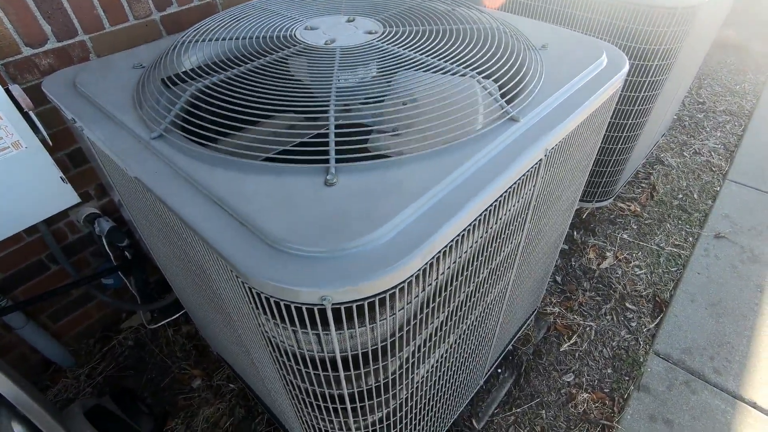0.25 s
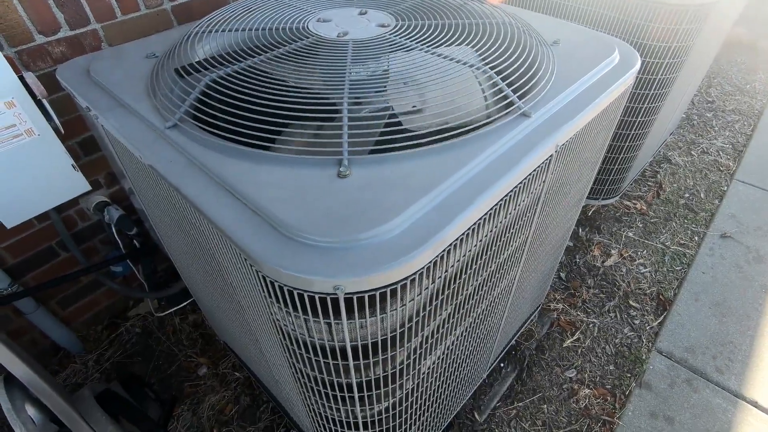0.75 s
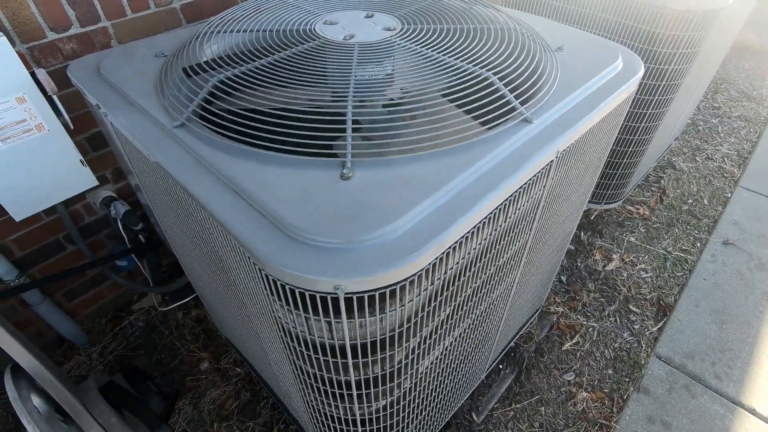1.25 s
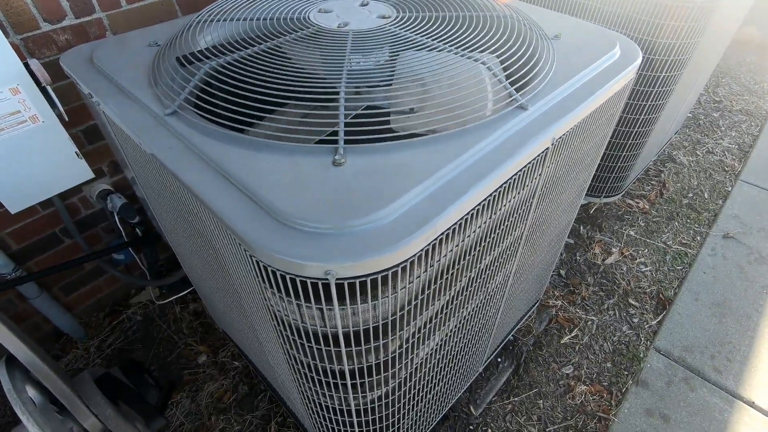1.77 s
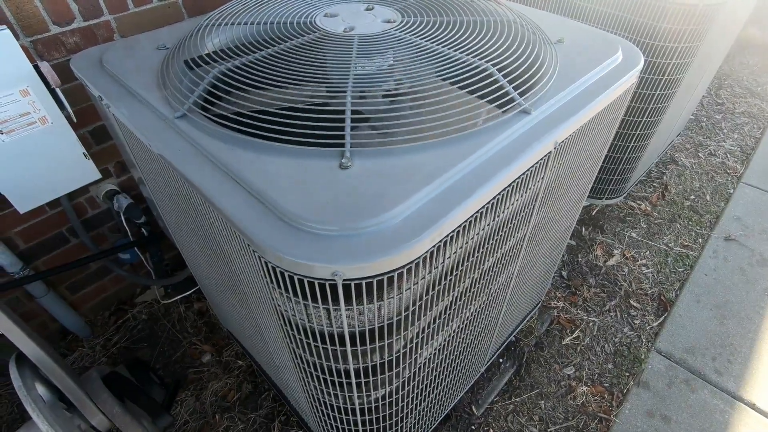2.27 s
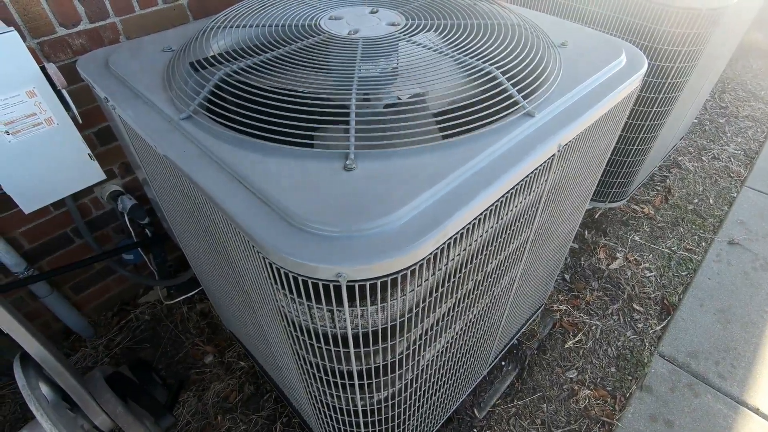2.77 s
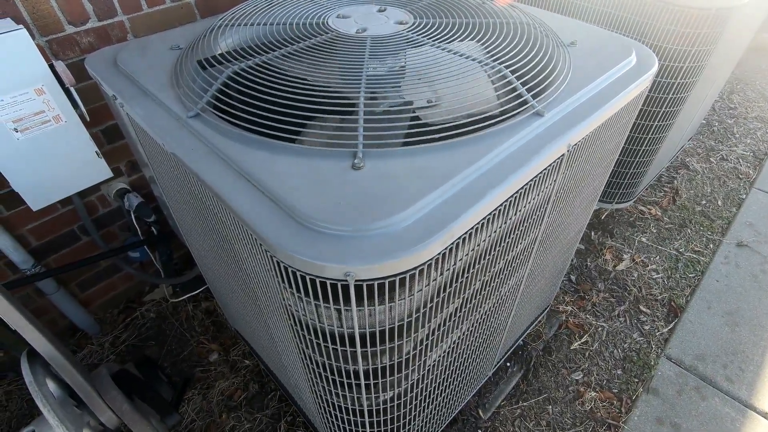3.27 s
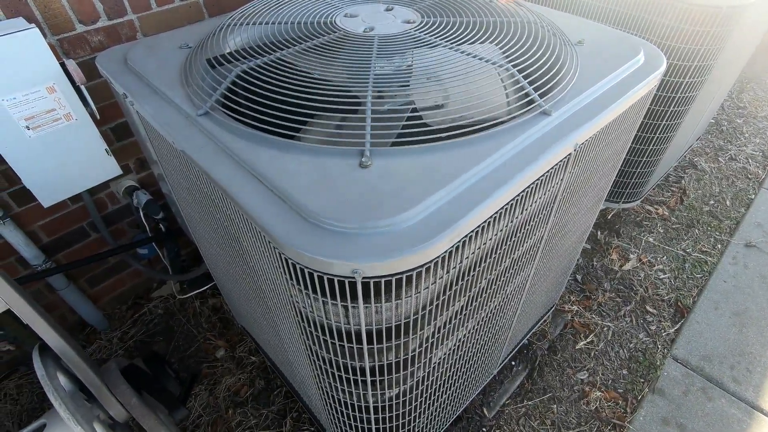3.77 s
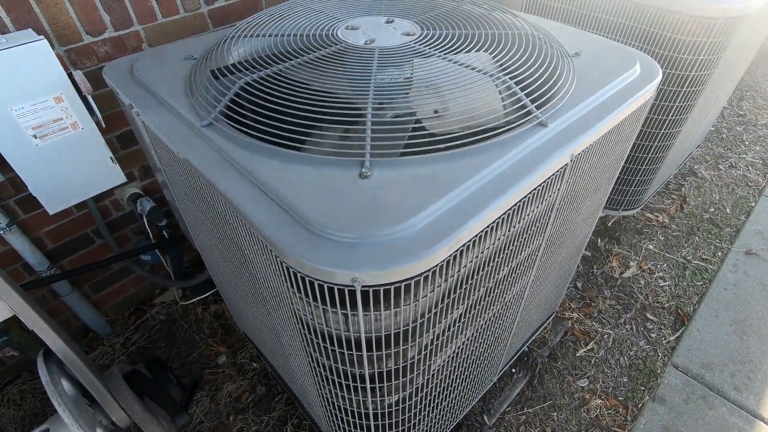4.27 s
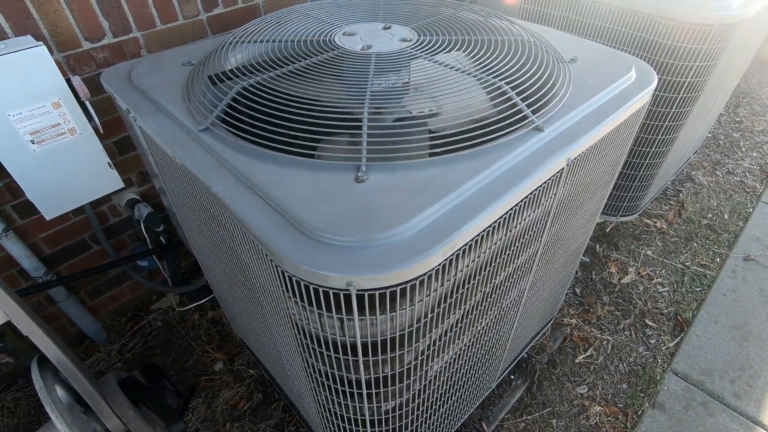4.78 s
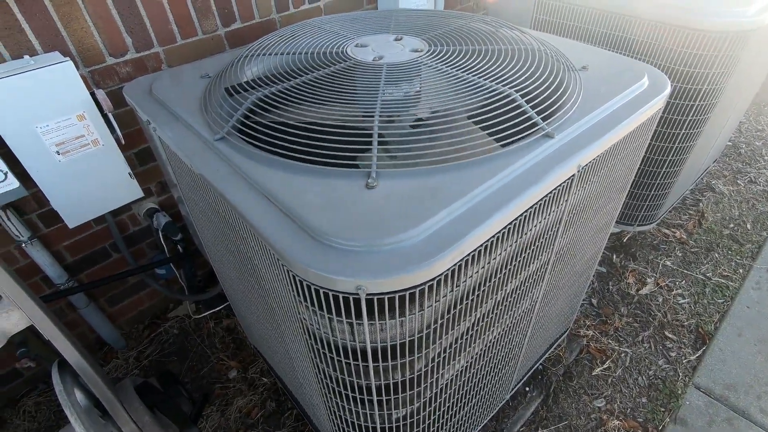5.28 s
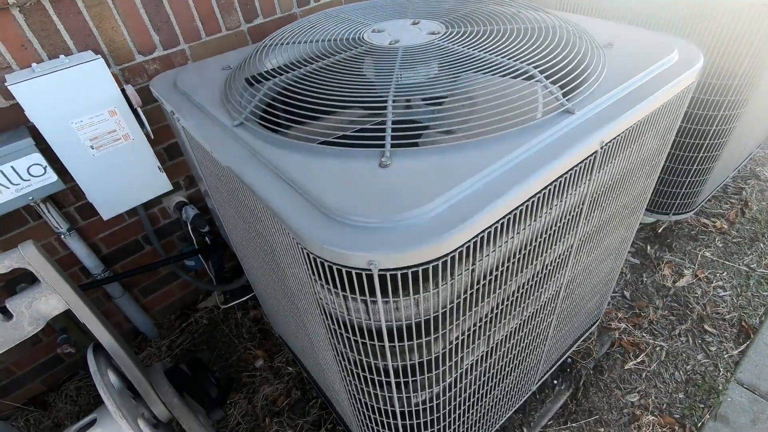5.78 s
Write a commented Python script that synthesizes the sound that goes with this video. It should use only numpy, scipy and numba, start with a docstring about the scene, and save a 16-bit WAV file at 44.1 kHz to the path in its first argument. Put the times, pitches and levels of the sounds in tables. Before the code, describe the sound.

From 0 to about 3 seconds an outdoor heat pump runs loudly, close by. Its deep, steady hum is centred near 240 hertz over a shaft rate of about 60, roughened by a fast buzzing shell rattle and refrigerant hiss puffing once per turn. Fan air rumbles underneath, and two faint low tones drift slowly upward. Between 3 and 3.6 seconds the hum drops sharply, the bright buzz falling away first, leaving a softer, lower hum and airy hiss. Faint pipe whistles flicker near 3.9 seconds. Light finger rubs and soft bumps touch the camera at 4.05 to 4.3. From 4.95 to 5.5 come clustered scrapes, sharp ticks and dull low thumps, strongest near 5.0, 5.15, 5.35 and 5.45. Another faint whistle passes around 5.6 to 5.85 while the hiss loses treble and sinks, leaving quiet hum and fan rumble to about 6 seconds.

```python
"""An outdoor heat pump, a step from a hand-held camera. The compressor beats once a shaft turn: the casing hums on
multiples of that rate, a burst-driven valve rattles the shell, and refrigerant noise hisses in puffs.
Fan noise rumbles throughout, the windings beat against the hum, and two low tones drift by.
After three seconds the load falls away and pipes whistle faintly; fingers rub, tick and bump on the camera body."""
import sys
import numpy as np
from scipy import signal
from scipy.fft import rfft, irfft, next_fast_len
from scipy.io import wavfile
from scipy.ndimage import uniform_filter1d, map_coordinates
from numba import njit

SR = 44100
rng = np.random.default_rng(int(sys.argv[2]) if len(sys.argv) > 2 else 0)


def master(y):
    """Save y as 16-bit WAV."""
    cut = np.clip(np.atleast_2d(y).T, -1, 1)
    pcm = np.round(cut * 32767)  # scale
    wavfile.write(sys.argv[1], SR, pcm.astype(np.int16))


N = 266011
t = np.arange(N) / SR

# Table levels are relative, ahead of the port response.
# compressor load: start_s, load [0-1], hum_db, hiss_db
LOAD_COURSE = [(0, 0.95, -23.5, -44), (1.3, 0.94, -23, -41.5), (2.85, 0.86, -23, -41.5),
               (3.05, 0.79, -25.5, -42.5), (3.3, 0.73, -31, -47.5), (3.6, 0.32, -33.5, -48.5),
               (4.1, 0.24, -34, -47), (4.8, 0.15, -34.5, -47), (5.2, 0.06, -38, -46),
               (5.55, 0.04, -42, -50.5), (5.8, 0, -44, -55), (6.03, 0, -43, -57)]
# casing hum under load: shaft_multiple, level_db
HUM_LOADED = [(1, -34.5), (2, -9), (3, -4), (4, 2.5), (5, -2.5), (6, -20.5), (7, -24.5), (8, -36), (9, -33),
              (10, -24.5), (11, -31), (12, -19), (13, -17.5), (14, -12.5), (15, -21.5), (16, -28),
              (17, -34.5), (18, -49), (19, -63), (20, -52.5), (21, -35.5), (22, -31), (23, -39.5),
              (24, -30), (25, -25), (26, -27), (27, -30), (28, -56.5), (29, -35), (30, -34), (31, -48),
              (32, -39), (33, -44), (34, -33.5), (35, -36.5), (36, -37), (37, -28), (38, -38), (39, -55.5),
              (40, -32.5), (41, -34), (42, -34), (43, -28.5), (44, -49), (45, -43), (46, -32), (47, -41.5),
              (48, -36), (49, -38.5), (50, -51), (51, -25.5), (52, -39), (53, -32.5), (54, -32), (55, -36),
              (56, -41.5), (57, -29), (58, -30), (59, -42), (60, -29.5), (61, -52), (62, -42), (63, -33),
              (64, -33.5)]
# casing hum off load: shaft_multiple, level_db
HUM_UNLOADED = [(1, -4.5), (2, -10.5), (3, -10.5), (4, -0.5), (5, -4), (6, -17), (7, -14.5), (8, -15.5),
                (9, -26.5), (10, -28), (11, -36), (12, -29.5), (13, -23.5), (14, -18), (15, -24.5),
                (16, -28.5), (17, -24), (18, -32), (19, -55), (20, -23), (21, -28.5), (22, -18.5),
                (23, -30), (24, -22.5), (25, -29.5), (26, -25), (27, -28), (28, -23), (29, -27), (30, -54),
                (31, -29), (32, -29), (33, -29), (34, -36.5), (35, -38), (36, -29), (37, -28.5), (38, -41),
                (39, -67), (40, -44), (41, -27), (42, -39), (43, -47), (44, -37), (45, -36), (46, -42),
                (47, -46), (48, -38), (49, -29.5), (50, -52), (51, -29), (52, -45), (53, -51), (54, -36),
                (55, -34), (56, -48), (57, -40), (58, -28), (59, -51), (60, -58), (61, -29), (62, -37),
                (63, -30), (64, -40)]
# shell modes: centre_hz, stage_width_hz, loaded_db, unloaded_db
SHELL_MODES = [(1242, 570, 1.5, 5), (3437, 39, -13.5, -8), (3970, 590, -1, -0.5), (4650, 590, 0, -10),
               (5060, 950, 1.5, -9), (5510, 300, 2, -2.5), (5940, 215, 7.5, 5), (6360, 130, -15, 3),
               (7350, 120, 4, -14.5), (8160, 76, -5, -19)]
# pipe resonances in the gas flow: centre_hz, width_hz, loaded_db, unloaded_db
PIPE_MODES = [(1320, 120, -19, 7), (2940, 125, -4, 11.5), (3230, 57, 4, 8.5), (3448, 66, 9.5, 11),
              (4690, 16, -17, 16.5), (3840, 97, -1.5, 8), (4465, 330, -0.5, 4), (5260, 180, -28, 6.5),
              (5560, 230, -3.5, -8), (6350, 680, -2, 1), (6760, 250, -10, 4.5), (7550, 120, -7, -39),
              (7800, 250, -3, -7), (9170, 112, -9.5, -1), (9730, 730, -24, -11.5), (11900, 600, -19, -19),
              (12700, 790, -29, -17), (13700, 800, -26, -28)]
# gas rush spectrum under load: freq_hz, density_db [dB per Hz]
RUSH_LOADED = [(410, -37), (700, -7), (839, -4), (1120, -40.5), (1500, -1), (1820, -15), (2720, -4),
               (3140, -15), (4170, -19), (5910, -10.5), (13200, -39), (15400, -68)]
# gas rush spectrum off load: freq_hz, density_db [dB per Hz]
RUSH_UNLOADED = [(410, -37), (700, -7), (828, 0.5), (1120, -11.5), (1300, 0), (2650, -12), (3390, -38),
                 (4930, -17), (6640, -16), (8280, -22.5), (12500, -30), (15400, -55)]
# fan spectrum: freq_hz, density_db [dB per Hz]
FAN_SPECTRUM = [(22, -44), (40, 3), (60, -4.5), (100, 10), (140, -12.5), (220, 0), (400, -20.5), (700, -20),
                (1200, -39.5), (2500, -26)]
# steady high hiss: centre_hz, width_hz, level_db
AIR_BANDS = [(12700, 600, -75), (13500, 3500, -74.5)]
# low drifting tone: start_s, pitch_hz, level_db
DRONE_COURSE = [(0, 79.1, -42), (.6, 86, -41), (1.2, 94, -40.5), (2, 101, -43), (2.8, 98.4, -40),
                (3.6, 99.7, -59), (4, 93.5, -89)]
# pipe whistles: start_s, length_s, pitch_hz, level_db
PIPE_WHISTLES = [(3.883, 0.087, 3770, -53), (3.913, 0.047, 4600, -48), (5.56, 0.29, 3750, -52.5)]
# finger rubs: start_s, length_s, level_db, first_tilt, last_tilt [dB per octave], end_pitch_factor
FINGER_RUBS = [(4.039, 0.022, -40, -2, 2, .8), (4.95, 0.019, -39.5, -10, -8, 1.02),
               (4.96, 0.61, -37.5, -26, -24, 0.93), (5.095, 0.077, -33.5, -10, -7.5, 1.11),
               (5.39, 0.073, -32.5, -6, -8, 1.0), (5.42, 0.04, -38, -1, 2, 1.33)]
# finger ticks: start_s, peak_db, tilt [dB per octave]
FINGER_TICKS = [(4.961, -26.5, 8), (5.098, -27, -11), (5.134, -28, 9), (5.248, -36, -16),
                (5.347, -23.5, -3.5), (5.426, -23, -9), (5.444, -27.5, 18)]
# bumps on the camera body: start_s, pitch_hz, ring_s [twice the 1/e time], level_db
BODY_BUMPS = [(4.052, 90, 0.11, -29), (4.293, 73, 0.035, -26), (4.999, 88, 0.014, -15),
              (5.158, 54.6, 0.049, -19.5), (5.354, 73.5, 0.021, -17), (5.444, 91, 0.024, -18),
              (5.456, 44.4, 0.074, -15.5), (5.169, 109.5, 0.017, -21), (5.386, 59, 0.058, -29.5)]
# camera body modes: centre_hz, stage_width_hz, level_db
BODY_MODES = [(415, 200, 7), (496, 330, -15), (944, 150, -0.5), (1166, 140, 4.5), (1517, 73, 2.5),
              (1890, 270, -1.5), (3500, 870, -4), (6660, 840, -3), (151, 150, -7.5)]
# two microphone ports: freq_hz, left_minus_right_db, left_lead_rad, likeness_index [0-1]
PORT_RESPONSE = [(30.2, -22, -0.67, 0.6), (58.7, -9.5, -0.29, 0.86), (110, -1, 0.13, 1),
                 (243, -5.5, -0.42, 0.13), (446, -8, 0.54, 0.7), (710, -10, 2.03, 0.63),
                 (893, -2.5, 1.35, 0.81), (1330, 2, 1.57, 0.61), (2710, 1.5, 0.66, 0.86),
                 (5470, -2.5, -0.92, 0.74), (6130, -5, 1.36, 0.75), (7700, 4.5, 1.63, 0.7),
                 (10400, -4, 1.77, 0.25), (12900, 3.5, -1.86, 0.32)]

SHAFT_HZ, MAGNETIC_PULL_HZ = 59.48, 120  # pull: twice the mains rate
# ahead of the low swing of the casing
VALVE_LEAD_TURNS, BRIGHT_LEAD_TURNS = 0.13, 0.0594
# pairs: loaded, unloaded
RATTLE_OVER_HISS_DB = (-1, -3.5)
TOP_OVER_HISS_DB, THIN_TOP_HZ = (-2, 6), 8200
WINDING_DB, WINDING_PEAK_S = (-48.5, -39.5), (0.83, 1.06)
# the hiss loses treble over this start and end
DULL_DB_PER_OCTAVE, DULL_FROM_HZ, DULL_S = -8, 5100, (5.55, 5.92)
FAN_DB, FAN_SWELL_DB = -37.5, 3.5
UNDERTONE_RATIO, UNDERTONE_DB = 0.61, -4
TOP_HZ = 15450


def undb(db):
    """Amplitude from dB."""
    return np.exp(np.asarray(db) * np.log(10) / 20)


def unit(x):
    """Scaled to rms 1."""
    return x / np.sqrt(np.mean(x ** 2))


def curves(table):
    """Every column as a line over time."""
    start_s, *columns = np.transpose(table)
    return [np.interp(t, start_s, column) for column in columns]


def over_hz(hz, table, column=1):
    """A column read on a log-frequency axis."""
    table = np.array(table)
    return np.interp(np.log(hz), np.log(table[:, 0]), table[:, column])


def by_load(pair, load):
    """Between the loaded and the unloaded value."""
    return pair[1] + load * (pair[0] - pair[1])


def walk(rate_hz):
    """Random levels joined smoothly, rate_hz a second; spread near 1."""
    step = int(SR / rate_hz)
    levels = rng.standard_normal(N // step + 2)
    line = np.interp(np.arange(N) / step, np.arange(N // step + 2), levels)
    return 1.09 * uniform_filter1d(line, step)


@njit
def ring_twice(x, hz, width):
    """A steep resonance: two state-variable band-passes with a moving centre, gain 1 there."""
    y, b, l, c, m = np.empty(len(x)), 0., 0., 0., 0.
    for i in range(len(x)):
        g, k = np.pi * hz[i] / SR, width / hz[i]
        g *= 1 + g * g / 3 + g ** 4 * 2 / 15  # tangent series
        r = 1 / (1 + g * (g + k))
        v = (b + g * (x[i] - l)) * r
        w = (c + g * (k * v - m)) * r
        b, l, c, m, y[i] = 2 * v - b, l + 2 * g * v, 2 * w - c, m + 2 * g * w, k * w
    return y


def band(hz, width_hz, drift=0):
    """Two unrelated noises through one steep resonance; power follows the width."""
    centre_hz = hz * (1 + drift + 0 * t)
    return np.array([ring_twice(rng.standard_normal(N), centre_hz, 1.58 * width_hz) for _ in range(2)])


def casing(load):
    """Multiples of the shaft rate in the phases of a ring after one push; high ones waver more, unlike at each port."""
    order, loaded_db = np.transpose(HUM_LOADED)
    unloaded_db = np.transpose(HUM_UNLOADED)[1]
    # minimum phase from the folded cepstrum
    cepstrum = irfft(np.log(undb(np.r_[-30, loaded_db, -42 * np.ones(64)])))
    cepstrum[1:128] *= 2
    cepstrum[129:] = 0
    phases = rfft(cepstrum).imag[1:][:len(order)]
    phases = phases + 2 * np.pi * BRIGHT_LEAD_TURNS * np.maximum(order - 7, 0)
    # the shell spreads the push in time: high multiples lose step
    phases = phases + np.clip((order - 18) / 20, 0, 1) * 0.45 * rng.standard_normal(len(order))
    turn_rad = 2 * np.pi * SHAFT_HZ * t + 0.0055 * walk(7.6)
    # strokes differ: the bright end swells and sags within a few turns
    stroke_db = 1.28 * walk(45)
    hum = np.zeros((2, N))
    for k, full_db, idle_db, phase in zip(order, loaded_db, unloaded_db, phases):
        waver = walk(3.008)
        phase = phase + 0.0015 * k * stroke_db + min((k / 60) ** 3, 0.8) * np.roll(waver, N // 2)
        # bright multiples fall away first as the load drops
        level_db = idle_db + load ** min(1 + k / 6, 3.2) * (full_db - idle_db)
        level_db = level_db + min(0.12 + (k / 13) ** 2, 3.5) * waver + min(k / 35, 1) * stroke_db
        line = -undb(level_db) * np.cos(k * turn_rad + phase)
        hum[0] += line
        hum[1] += min((k / 14) ** 2, 1.2) * line * waver[::-1]
    return np.sqrt(2) * hum


def valve(load):
    """Nearly the same burst of rattle every turn rings the shell; it limps strong-weak for a while as load falls."""
    count, size = int(N / SR * SHAFT_HZ) + 3, int(SR / SHAFT_HZ)
    keep = 0.85  # likeness of one burst to the next
    noise = rng.standard_normal((count + 60, size))
    bursts = signal.lfilter([np.sqrt(1 - keep ** 2)], [1, -keep], noise, axis=0)[60:]
    phase = np.arange(size) / size
    bursts = bursts * (0.26 + np.exp(-phase / 0.35) + 1.04 * np.exp(-phase / 0.03))
    turn = SHAFT_HZ * t + VALVE_LEAD_TURNS
    limp = 1 + 0.22 * np.exp(-((t - 4.17) / 0.088) ** 2) * (-1) ** turn.astype(int)
    rattle = limp * map_coordinates(bursts, [turn // 1, turn % 1 * size], order=3, mode="nearest")
    rings = 0
    for hz, width_hz, loaded_db, unloaded_db in SHELL_MODES:
        level_db = by_load((loaded_db, unloaded_db), load) + 1.5 * walk(15)
        rings = rings + undb(level_db) * ring_twice(rattle, hz + 0 * t, 1. * width_hz)
    return rings / np.sqrt(np.mean(rings[:2 * SR] ** 2))


def dull(hz):
    """Loss in dB of a band of the hiss over time."""
    return DULL_DB_PER_OCTAVE * max(np.log2(hz / DULL_FROM_HZ), 0) * np.interp(t, DULL_S, [0, 1])


def gas(load, top_db):
    """Refrigerant hiss: a broad rush and pipe resonances that flicker, both puffing once a turn."""
    phase = (SHAFT_HZ * t + VALVE_LEAD_TURNS) % 1
    puff = 1 + (0.37 + 1.63 * load) * np.exp(-phase / 0.42)
    puff = uniform_filter1d(puff, size=40)  # each puff swells in over about a millisecond
    rush, pipes = 0, 0
    for hz in 900 * 2 ** np.arange(0, 4.2, 1 / 3):
        level_db = by_load((over_hz(hz, RUSH_LOADED), over_hz(hz, RUSH_UNLOADED)), load)
        level_db = level_db + 0.41 * walk(9) + dull(hz) + top_db * (hz > THIN_TOP_HZ)
        rush = rush + undb(level_db) * band(hz, hz / 4)
    for hz, width_hz, loaded_db, unloaded_db in PIPE_MODES:
        level_db = by_load((loaded_db, unloaded_db), load) + (3.8 - 2.1 * load) * walk(18)
        level_db = level_db + dull(hz) + top_db * (hz > THIN_TOP_HZ)
        pipes = pipes + undb(level_db) * band(hz, width_hz, 0.0098 * walk(4.26))
    return puff * (unit(rush) * undb(-6.5) + unit(pipes) * undb(-3.5))


def fan():
    """Low rush of air through the grille, each band flickering alone."""
    rush = 0
    for hz in 22 * 2 ** np.arange(0, 7, 0.5):
        rush = rush + undb(over_hz(hz, FAN_SPECTRUM) + 0.5 * walk(3.7)) * band(hz, hz / 3)
    return unit(rush)


def air():
    """Steady high hiss: fixed bands of noise."""
    return sum(undb(db) * unit(band(hz, width_hz)) for hz, width_hz, db in AIR_BANDS)


def windings(load):
    """The motor pulls at twice the mains rate and beats once a second with the second multiple of the shaft."""
    beat_hz = MAGNETIC_PULL_HZ - 2 * SHAFT_HZ
    beat_rad = 2 * np.pi * beat_hz * (t - by_load(WINDING_PEAK_S, load))
    return np.sqrt(2) * np.sin(4 * np.pi * SHAFT_HZ * t + beat_rad + 0.1 * walk(4.3))


def drone():
    """Two low wavering tones, perhaps a far engine, that climb and sink away."""
    pitch_hz, level_db = curves(DRONE_COURSE)
    turn_rad = 2 * np.pi * np.cumsum(pitch_hz * (1 + 0.016 * walk(6.3))) / SR
    upper = undb(4.6 * walk(3.6)) * np.sin(turn_rad)
    under = undb(UNDERTONE_DB + 3.3 * walk(2.7)) * np.sin(UNDERTONE_RATIO * turn_rad)
    return np.sqrt(2) * undb(level_db) * (upper + under)


def whistles():
    """Pipes whistle for a moment: narrow noise that swells and fades."""
    out = np.zeros(N)
    for start_s, length_s, hz, db in PIPE_WHISTLES:
        n = int(length_s * SR)
        tone = unit(ring_twice(rng.standard_normal(n), hz + np.zeros(n), 110.0))
        out[int(start_s * SR):][:n] += undb(db) * np.hanning(n) ** 0.5 * tone
    return out


def body(push, tilt_db, glide=1):
    """The camera body rings; a brighter touch favours the upper modes."""
    out = 0
    for hz, width_hz, db in BODY_MODES:
        level_db = db + tilt_db * np.log2(hz / BODY_MODES[0][0])
        out = out + undb(level_db) * ring_twice(push, hz * glide + 0 * push, 1. * width_hz)
    return out


def fingers():
    """Rubs are dense slips and ticks single slips into the body; bumps are short low swings."""
    out = np.zeros(N + SR)
    u = np.arange(SR * 3 // 5) / SR
    for start_s, length_s, db, first_tilt, last_tilt, end_factor in FINGER_RUBS:
        slips = np.where(rng.random(len(u)) < 0.025, rng.standard_normal(len(u)), 0)
        slips = slips * np.sin(np.pi * np.minimum(u / length_s, 1))
        tilt_db = np.interp(u, [0, length_s], [first_tilt, last_tilt])
        glide = np.interp(u, [0, length_s], [1, end_factor])
        rub = body(uniform_filter1d(slips, size=12), tilt_db, glide)
        rms = np.sqrt(np.sum(rub ** 2) / SR / length_s)
        out[int(start_s * SR):][:len(u)] += undb(db) * rub / rms
    for start_s, db, tilt_db in FINGER_TICKS:
        snap = body(u * np.exp(-u / 0.00005), tilt_db)
        out[int(start_s * SR):][:len(u)] -= undb(db) * snap / np.abs(snap).max()
    for start_s, hz, ring_s, db in BODY_BUMPS:
        swing = np.sin(2 * np.pi * hz * u) * np.exp(-(2 * u / ring_s) ** 2)
        out[int(start_s * SR):][:len(u)] -= undb(db) * swing
    return out[:N]


def ports(common, apart):
    """Each port hears its own level and phase; unlike parts of the noise come from the second draw."""
    size = next_fast_len(N + SR)
    hz = np.maximum(np.arange(size // 2 + 1) * SR / size, 1)
    # half the level and phase difference to each side
    tilt = undb(over_hz(hz, PORT_RESPONSE) / 2) * np.exp(0.5j * over_hz(hz, PORT_RESPONSE, column=2))
    likeness = np.clip(over_hz(hz, PORT_RESPONSE, column=3), 0.05, 1)
    unlike = np.sqrt(1 / likeness ** 0.5 - 1)
    same, different = rfft(common, size), unlike * rfft(apart, size)
    mid = (tilt + 1 / tilt) / 2
    scale = 1 / np.maximum(abs(mid), 0.6)  # steadies the sum of the ports
    left, right = (same + different) * tilt, (same - different) / tilt
    return irfft(np.array([left, right]) * scale, size)[:, :N]


def scene():
    """Wide noise and hum plus centred sources, heard at two ports."""
    load, hum_db, hiss_db = curves(LOAD_COURSE)
    load = np.clip(load, 0, 1)
    hiss = undb(hiss_db) * gas(load, by_load(TOP_OVER_HISS_DB, load))
    rumble = undb(FAN_DB + FAN_SWELL_DB * walk(5)) * fan()
    wide = hiss + rumble + undb(hum_db) * casing(load) + air()
    rattle = undb(hiss_db + by_load(RATTLE_OVER_HISS_DB, load)) * valve(load)
    pull = undb(by_load(WINDING_DB, load)) * windings(load)
    centred = rattle + pull + drone() + whistles() + fingers()
    return ports(centred + wide[0], wide[1])


def record(dry):
    """The microphones fade above 14 kHz and the camera cuts the top steeply."""
    soft = signal.sosfilt(signal.butter(2, 14600, fs=SR, output="sos"), dry)
    return signal.sosfilt(signal.ellip(10, 0.2, 70, TOP_HZ, fs=SR, output="sos"), soft)


dry = scene()
out = record(dry)
master(out)
```